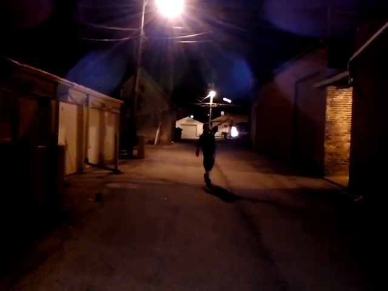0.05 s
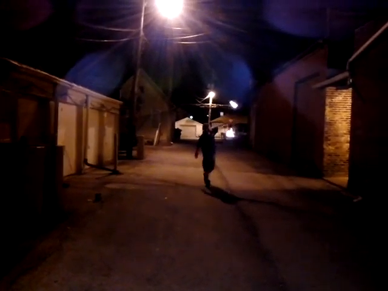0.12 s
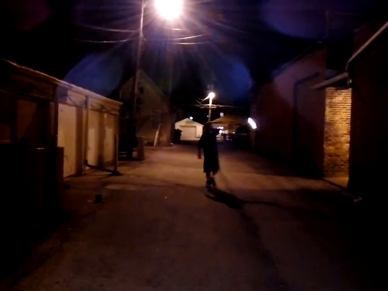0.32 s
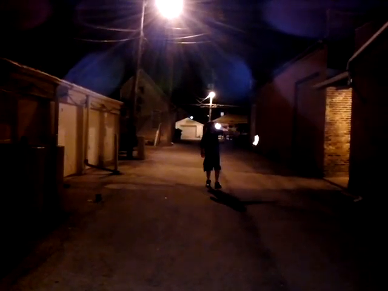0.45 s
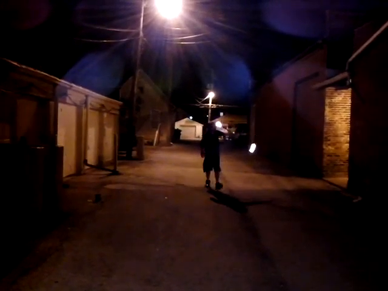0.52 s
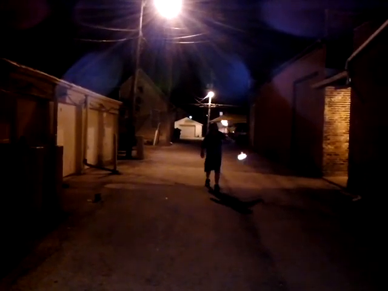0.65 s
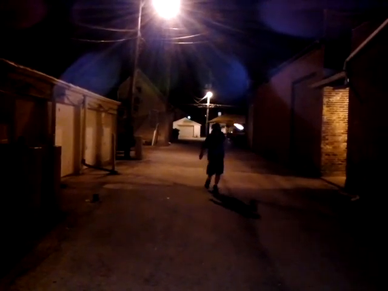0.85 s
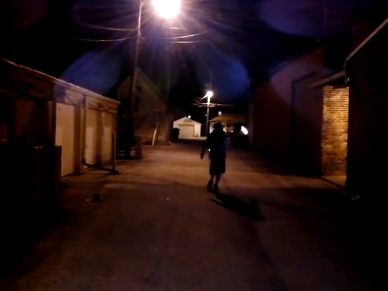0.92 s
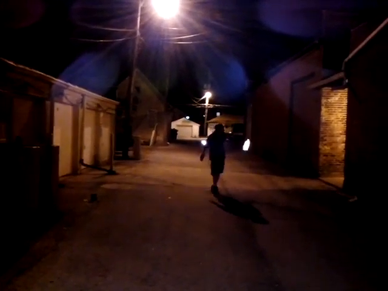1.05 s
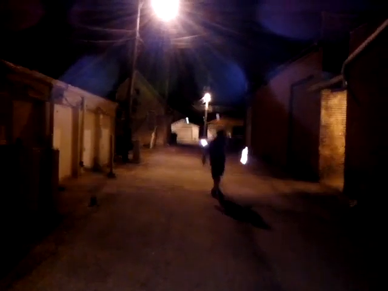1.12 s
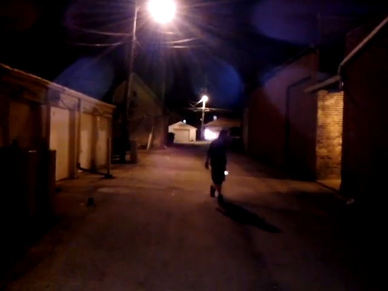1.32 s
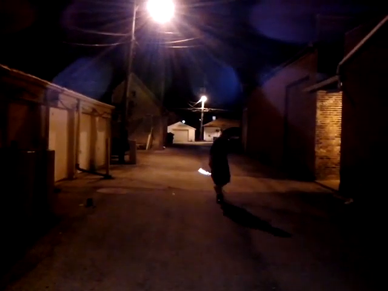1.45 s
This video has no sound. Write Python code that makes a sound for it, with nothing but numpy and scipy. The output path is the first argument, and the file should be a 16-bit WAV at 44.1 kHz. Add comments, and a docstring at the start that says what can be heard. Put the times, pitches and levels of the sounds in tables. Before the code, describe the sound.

Swinging flames swell into a low, fluttering whoosh, and a softer, duller one follows about a second later. Between them comes a faint sizzle, over the faint hum and hiss of a quiet alley at night.

```python
"""A low, fluttering flame roar swells into a whoosh; a softer, duller one follows a second later.
Two burning wicks swing on chains in a quiet alley at night; fast sweeps tear the flame into flaps.
A faint sizzle comes and goes, with soft rushes of air and two small taps near the end.
Behind it, night air hums and hisses with a faint whine; its treble dips during each whoosh."""
import sys
import numpy as np
from scipy import signal
from scipy.fft import rfft, irfft
from scipy.io import wavfile
from scipy.ndimage import uniform_filter1d

SR = 44100
rng = np.random.default_rng(int(sys.argv[2]) if len(sys.argv) > 2 else 0)


def pcm_store(signal):
    """Save signal as 16-bit PCM."""
    levels = np.round(np.clip(np.atleast_2d(signal), -1, 1) * 32767)
    wavfile.write(sys.argv[1], SR, levels.astype(np.int16).T)


N = 66150
T = np.arange(N) / SR

# roar envelope (time [s], relative level [dB])
ROAR_ENVELOPE = [(0, -61.5), (.044, -77.5), (.10, -65.5), (.143, -50), (.175, -61.5), (.205, -35.5),
                 (.26, -43.5), (.31, -27.5), (.338, -43), (.388, -60.5), (.458, -69.5), (.478, -54),
                 (.588, -54), (.735, -59.5), (.762, -54), (.922, -73), (1.068, -70.5), (1.092, -55),
                 (1.148, -63.5), (1.168, -48.5), (1.212, -46), (1.232, -61), (1.30, -61), (1.5, -79)]
# flaps of a passing flame (time [s], relative level [dB], torn share of power [0-1])
FLAME_FLAPS = [(0.199, -41.5, 0.3), (0.215, -30, 0.03), (0.236, -23, 0), (0.257, -28.5, 0.26),
               (.277, -24.5, 0.6), (0.301, -25, 0.79), (0.319, -36, 0.2), (1.169, -38, 0),
               (1.184, -47.5, 0)]
# slow flutter (frequency [Hz], relative density [dB])
FLUTTER_SPECTRUM = [(20, -14.5), (38, -20), (55, -26.5), (80, -10.5), (115, 5), (165, 2), (230, -14.5),
                    (320, -27.5), (480, -44), (900, -72)]
# flame torn by a fast swing (frequency [Hz], relative density [dB])
TORN_SPECTRUM = [(20, -17), (38, -19.5), (55, -27.5), (110, -4), (230, 3.5), (330, -13), (490, -23),
                 (620, -57), (770, -30), (1100, -87)]
# soft taps (time [s], level [dB], centre [Hz], decay [s])
TAPS = [(1.237, -68, 620, 0.0035), (1.3, -65.5, 1320, 0.001)]
# sizzle (time [s], time sigma [s], level [dB], centre [Hz], band sigma [oct])
SIZZLE_SWELLS = [(0.109, 0.06, -76.5, 3870, 0.12), (.21, 0.014, -73, 3650, .15),
                 (0.221, 0.0076, -75.5, 1740, .45), (0.33, .028, -70, 3666, 0.023),
                 (0.388, 0.043, -75, 3740, .11), (0.397, 0.024, -81, 6340, .04),
                 (0.715, 0.03, -78, 3720, 0.15), (0.793, 0.03, -73, 4070, 0.22),
                 (0.824, 0.019, -76.5, 6550, 0.05), (0.854, 0.028, -76, 5200, 0.18),
                 (1.341, 0.055, -81, 3790, 0.13)]
# moving air (time [s], time sigma, sign ignored [s], level [dB], centre [Hz], band sigma [oct])
RUSH_SWELLS = [(0.144, 0.03, -77, 380, 0.69), (0.215, 0.015, -63, 990, 1),
               (0.368, 0.06, -67.5, 310.5, 0.86), (0.433, -0.04, -75.5, 900, 0.75),
               (0.715, 0.2, -79, 620, 1), (1.25, 0.054, -77, 670, 1), (1.309, 0.13, -72, 299, 0.33)]
# night air (frequency [Hz], relative density [dB])
AIR_SPECTRUM = [(20, -12), (60, -11), (160, 1.5), (320, 0), (550, -11.5), (850, -10.5), (1400, -14.5),
                (2900, -19.5), (4000, -17), (5200, -20), (7300, -18.5)]
# steady whine (frequency [Hz], level [dB])
WHINE_TONES = [(1334, -91.5), (2000, -94.5), (2667, -96)]
# background treble dips (start [s], end [s], corner [Hz], gain [dB])
TREBLE_DIPS = [(0.174, 0.346, 1007, -25.5), (0.197, 0.408, 4640, -20), (1.131, 1.248, 1100, -16.5)]


def flames(flicker_db=3.38, flutter_gain_db=-2, torn_gain_db=2):
    """Dull turbulent roar; fast sweeps tear the flame into brighter flaps."""
    roar_db = uniform_filter1d(np.interp(T, *np.transpose(ROAR_ENVELOPE)), size=200)
    roar_db += flicker_db * wobble(scale_s=0.012)
    dull_power, torn_power = amp(roar_db) ** 2, np.zeros(N)
    flap_half_s = 0.0064
    for time_s, level_db, torn_share in FLAME_FLAPS:
        power = amp(level_db) ** 2 * np.exp(-((T - time_s) / flap_half_s) ** 2)
        dull_power += power * (1 - torn_share)
        torn_power += power * torn_share
    flutter = lowpass(np.sqrt(dull_power) * eddies(FLUTTER_SPECTRUM), corner_hz=295)
    torn = lowpass(np.sqrt(torn_power) * eddies(TORN_SPECTRUM), corner_hz=940)
    return amp(flutter_gain_db) * flutter + amp(torn_gain_db) * torn


def eddies(spectrum, eddy_s=0.011):
    """Turbulence: pressure swings of similar strength and uneven length."""
    pressure = shaped_noise(spectrum + [(2500, -99.5)])
    window = signal.windows.hann(2 * int(eddy_s * SR) + 1)
    local_power = signal.fftconvolve(pressure ** 2, window / window.sum(), "same")
    return unit_rms(pressure / np.sqrt(abs(local_power) + 1e-20))


def taps(rise_s=0.00093):
    """Small noise bursts: Gaussian rise, exponential decay."""
    out = np.zeros(N)
    for time_s, level_db, centre_hz, decay_s in TAPS:
        age_s = T - time_s
        envelope = np.exp(np.where(age_s < 0, -(age_s / rise_s) ** 2, -age_s / decay_s))
        out += amp(level_db) * noise_band(centre_hz, sigma_oct=0.5) * envelope
    return out


def sizzle():
    """Thin, grainy hiss that comes and goes as the wicks go round."""
    grain = unit_rms(amp(2.5 * wobble(scale_s=0.0044)))
    return grain * sum(swell(*row) for row in SIZZLE_SWELLS)


def air_rushes():
    """Broad, faint swells of air around the swings."""
    return sum(swell(*row) for row in RUSH_SWELLS)


def night_air(noise_db=-71.5):
    """Distant hum and hiss with a faint whine."""
    whine = sum(amp(level_db) * np.sqrt(2) * np.sin(2 * np.pi * (hz * T + rng.random()))
                for hz, level_db in WHINE_TONES)
    return amp(noise_db) * unit_rms(shaped_noise(AIR_SPECTRUM)) + whine


def dip_treble(x, ramp_s=0.019):
    """Brief treble cuts at the listed times."""
    for start_s, end_s, corner_hz, gain_db in TREBLE_DIPS:
        low = lowpass(x, corner_hz, order=6)
        gate = np.clip(np.minimum(T - start_s, end_s - T) / ramp_s + 0.5, 0, 1)
        x = low + (x - low) * amp(gain_db * gate)
    return x


def swell(time_s, sigma_s, level_db, centre_hz, sigma_oct):
    """Noise band under a Gaussian envelope."""
    envelope = np.exp(-0.5 * ((T - time_s) / sigma_s) ** 2)
    return amp(level_db) * noise_band(centre_hz, sigma_oct) * envelope


def noise_band(centre_hz, sigma_oct):
    """Noise in a bell-shaped band, rms 1."""
    offset_oct = np.log2((np.fft.rfftfreq(N, 1 / SR) + 1) / centre_hz)
    gain = np.exp(-0.5 * (offset_oct / sigma_oct) ** 2)
    return unit_rms(irfft(rfft(rng.standard_normal(N)) * gain, N))


def shaped_noise(spectrum):
    """White noise filtered by (frequency [Hz], gain [dB]) points."""
    points_hz, points_db = np.transpose(spectrum)
    bins_hz = np.fft.rfftfreq(2 * N, 1 / SR)
    gain_db = np.interp(np.log(bins_hz + 1), np.log(points_hz), points_db)
    return irfft(rfft(rng.standard_normal(N), 2 * N) * amp(gain_db))[:N]


def wobble(scale_s):
    """Smooth random drift, rms 1."""
    window = signal.windows.hann(2 * int(scale_s * SR) + 1)
    return unit_rms(signal.fftconvolve(rng.standard_normal(N), window, "same"))


def lowpass(x, corner_hz, order=4):
    return signal.sosfiltfilt(signal.butter(order, corner_hz, fs=SR, output="sos"), x)


def amp(db):
    return 10 ** (np.asarray(db) / 20)


def unit_rms(x):
    return x / np.sqrt(np.mean(x ** 2) + 1e-20)


def scene():
    """Fire in front, night air behind; mono."""
    return (flames() + taps() + sizzle() + dip_treble(night_air() + air_rushes()))[None]


def record(dry):
    """Steep band limit."""
    cutoff_hz = 7850
    kernel = signal.firwin(511, cutoff_hz, window=("kaiser", 9), fs=SR)
    return signal.oaconvolve(dry, kernel[None], "same")


dry = scene()
out = record(dry)
pcm_store(out)
```